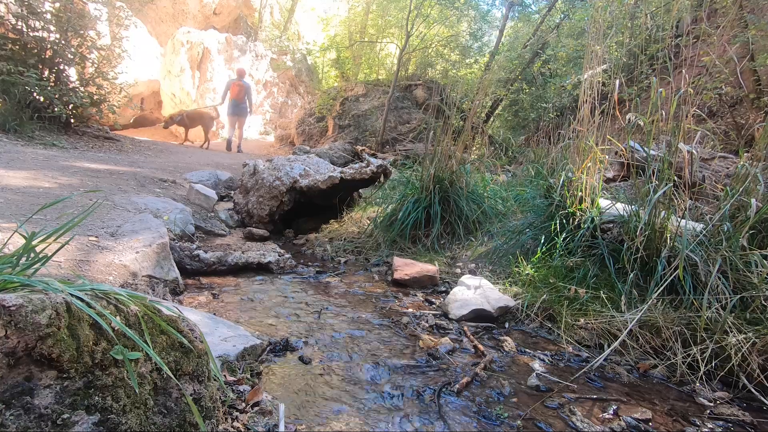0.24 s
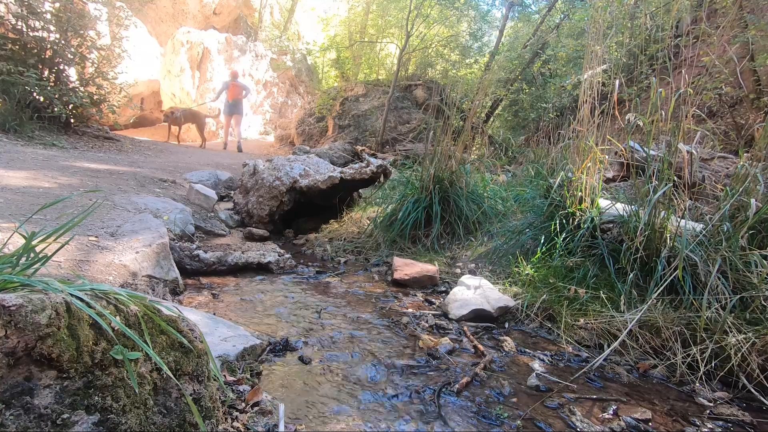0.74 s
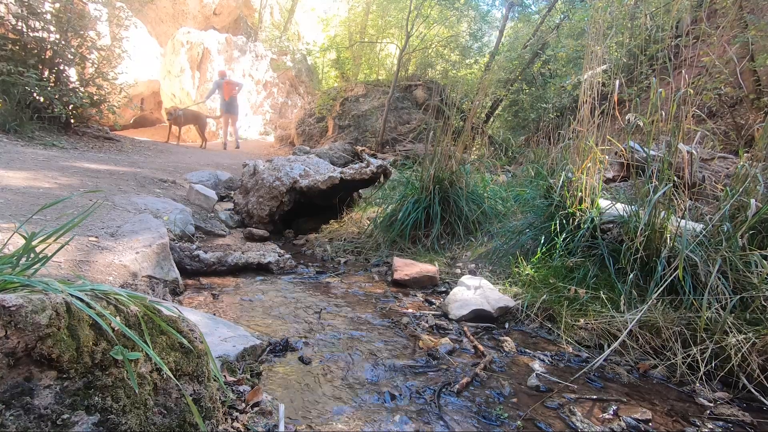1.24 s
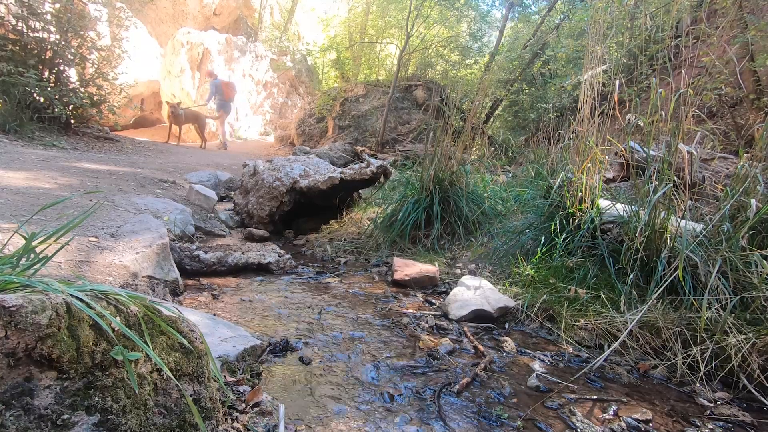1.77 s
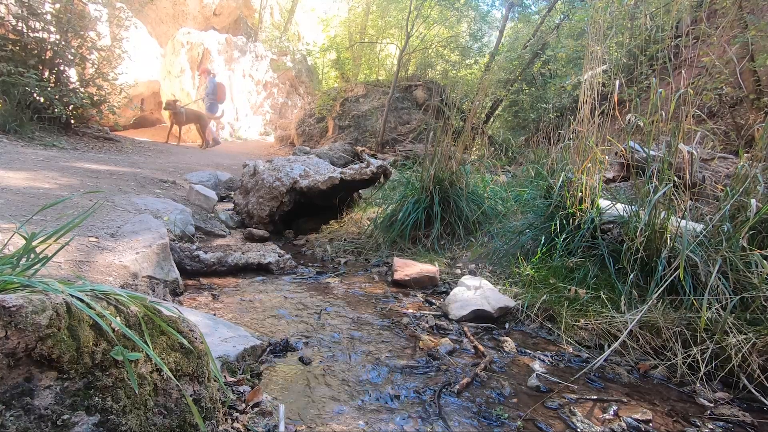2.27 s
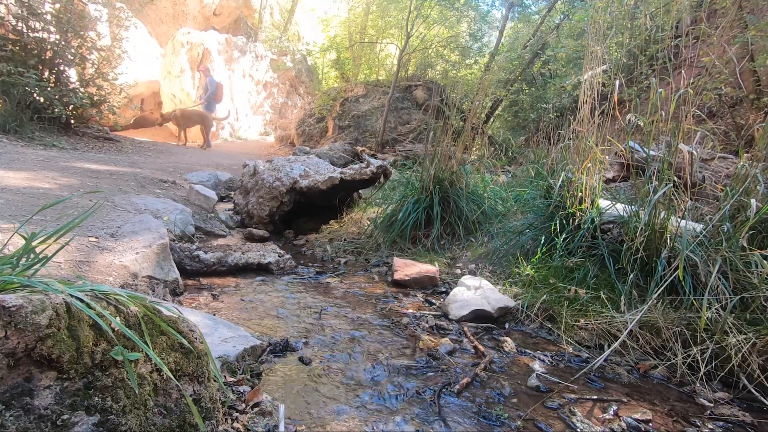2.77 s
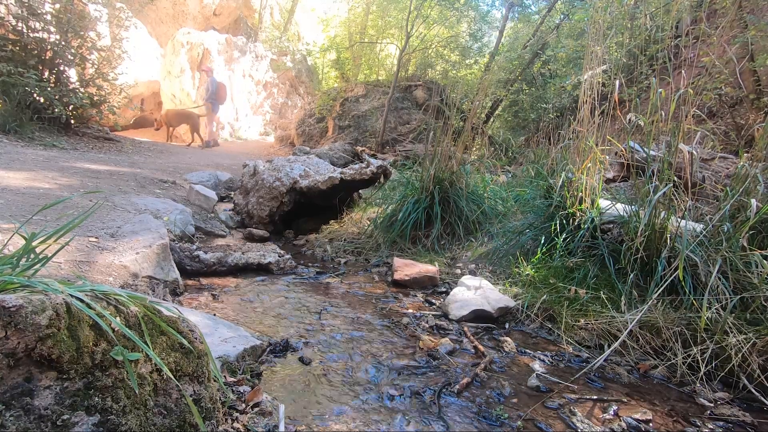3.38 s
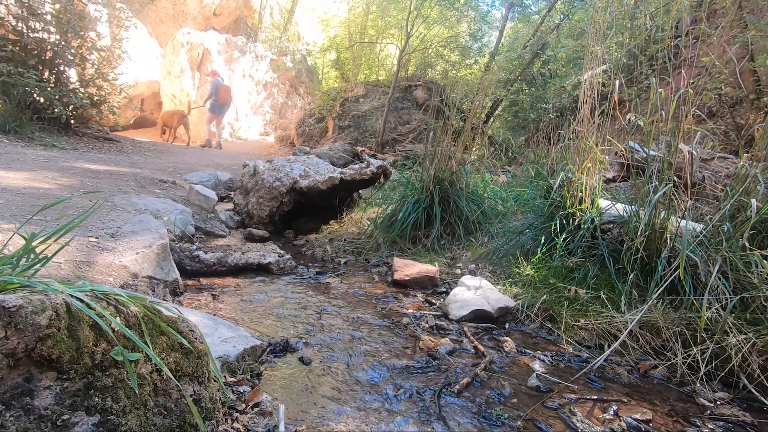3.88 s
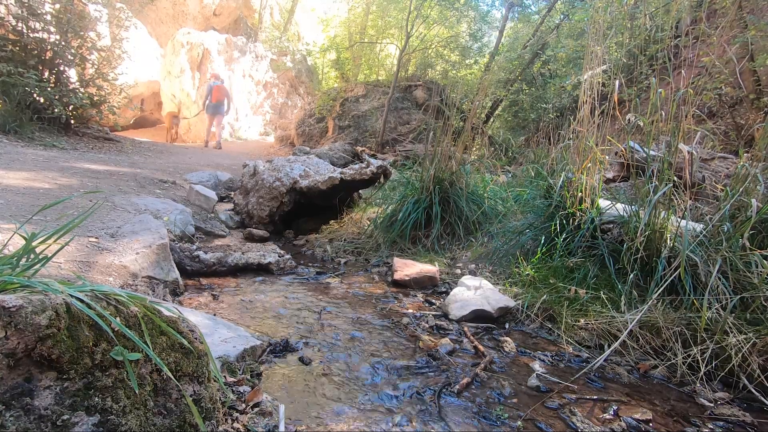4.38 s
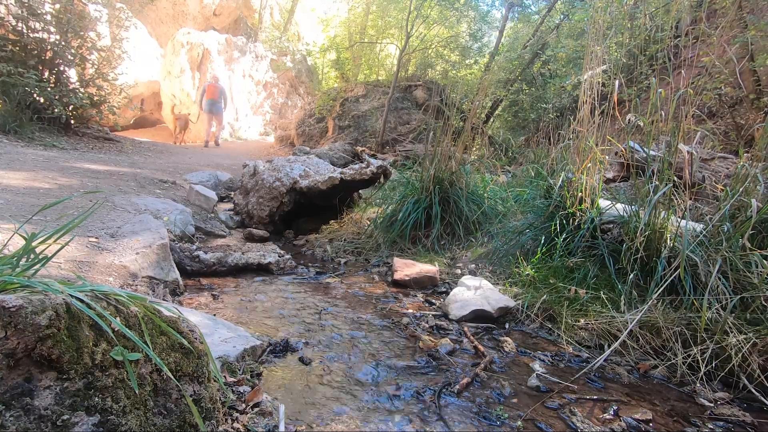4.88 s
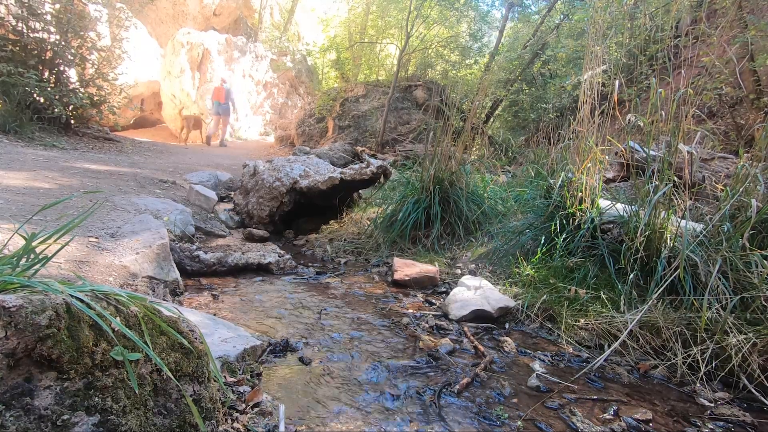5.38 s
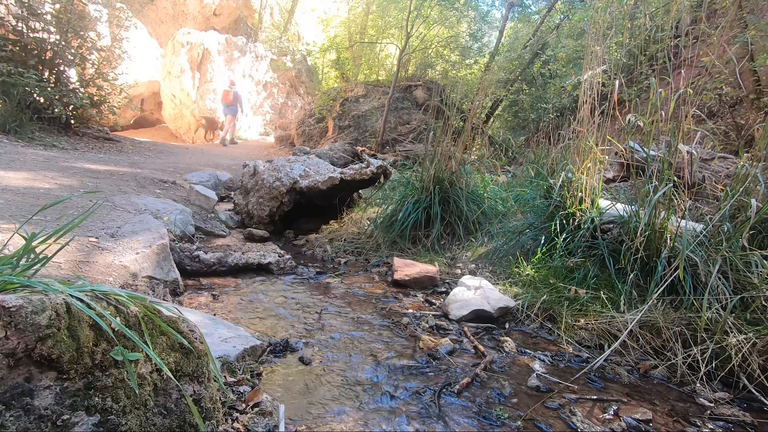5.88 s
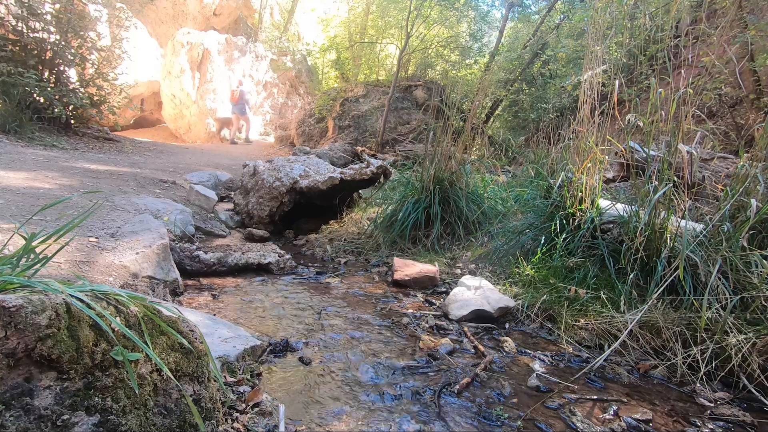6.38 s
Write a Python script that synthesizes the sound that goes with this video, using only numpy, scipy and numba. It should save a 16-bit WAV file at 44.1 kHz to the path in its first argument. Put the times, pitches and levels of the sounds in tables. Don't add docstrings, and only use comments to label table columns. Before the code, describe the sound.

A shallow creek babbles softly outdoors with plinking bubbles, small drop slaps and low glugs, while a handheld microphone gets bumped and rubbed.

```python
import sys
import numpy as np
from scipy import signal
from scipy.fft import rfft, irfft, next_fast_len
from scipy.io import wavfile
from scipy.ndimage import uniform_filter1d
from numba import njit

SR = 44100
rng = np.random.default_rng(int(sys.argv[2]) if len(sys.argv) > 2 else 0)


def boost_factor(decibels):
    exponent = np.asarray(decibels, float) / 20
    return 10 ** exponent


def materialize(psi):
    bounded = np.clip(np.atleast_2d(psi).T, -1, 1)
    quanta = np.round(bounded * 32767).astype(np.int16)
    wavfile.write(sys.argv[1], SR, quanta)


N = 292824
CUT_S, TOP_HZ = 0.13218, 15750

# frequency in Hz, level in dB.
LEFT_COLOUR_HZ_DB = [(20, -58), (45, -84), (110, -81), (250, -87), (450, -87), (900, -88), (2000, -89),
                     (2900, -94.5), (4500, -92.5), (7000, -102.4), (10000, -105.1), (15500, -108.0)]
# frequency in Hz, level in dB.
RIGHT_COLOUR_HZ_DB = [(20, -63), (45, -81), (110, -86), (250, -92.5), (450, -94.5), (900, -95.5),
                      (2000, -97), (2900, -99.3), (4500, -101.8), (7000, -104.9), (10000, -107.0),
                      (15500, -108.8)]
# resonance in Hz, width in Hz, level in dB.
HOLLOWS = [
    (560, 28, 2),
    (650, 91, -8),
    (970, 54, -4),
    (1200, 117, -6),
    (1609, 24, 1.5),
    (1890, 143, -3.5),
    (2500, 560, -6.5),
    (3500, 36, 3.5),
]
# time in seconds, level in dB re usual.
FLOW_DB = [(0.0, -6), (0.13, 0), (0.3, 1), (0.53, 2.5), (0.77, 5), (1.15, 1.5), (1.71, 5), (1.94, 2.5),
           (2.18, 4), (2.41, -1), (2.65, 2.5), (3.59, 1), (4.76, 2.5), (5.7, 2), (5.94, 4.5), (6.17, 0),
           (6.41, 2), (6.64, 3)]
# time in seconds, slow swing in dB.
SWAY_DB = [(0.14, -38.5), (0.27, -40.5), (0.6, -43), (0.8, -36), (0.95, -45.5), (1.35, -47), (1.55, -44),
           (1.8, -47), (2.2, -44.5), (2.38, -34.5), (2.55, -38.5), (2.8, -35), (3.0, -40), (4.2, -48),
           (4.43, -41), (4.6, -46.5), (5.9, -49.5), (6.64, -47)]
# start in seconds, peak in dB, pitch in Hz, t60 in seconds.
BUMPS = [(0.159, -34, 108, 0.16), (0.31, -53.5, 116, 0.62), (0.74, -34.5, 107.2, 0.19),
         (2.286, -47.5, 96, 0.18), (2.569, -52, 107.6, 0.33), (2.735, -41.5, 108, 0.19),
         (0.56, -58, 188, 0.083), (5.88, -54, 164, 0.16), (6.24, -59.5, 205, 0.19), (5.181, -51, 150, 0.14),
         (1.168, -58, 55, .15), (1.781, -55, 65.4, 0.16), (2.061, -53, 75, 0.19), (4.8, -63, 99.3, 0.44),
         (5.73, -58, 50, 0.17), (6.449, -61, 61, 0.34)]
# start in seconds, length in
# seconds, level in dB, centre in Hz, width in Hz.
RUBS_AND_SPLASHES = [(0.161, 0.12, -61, 1980, 1470), (0.604, 0.054, -55.5, 2200, 1590), (0.616, 0.076, -54.5, 410, 500),
                     (0.71, 0.06, -70, 2500, 4000), (0.796, 0.033, -58.5, 3000, 3500), (0.87, 0.07, -60.5, 3230, 4000),
                     (1.316, 0.13, -61, 1200, 2000), (1.558, 0.12, -67.5, 6750, 8100), (2.448, 0.058, -56, 2170, 1400),
                     (2.45, 0.083, -54.5, 460, 604), (4.003, 0.043, -57, 890, 1500), (5.724, 0.037, -60, 800, 1200),
                     (1.783, 0.081, -63, 3000, 3500), (5.962, .02, -68, 5000, 6000), (6.03, .02, -66, 5000, 6000),
                     (6.531, 0.016, -61, 1500, 3000), (6.598, .016, -65, 1200, 3020), (1.149, 0.016, -64, 2200, 3500),
                     (4.59, 0.035, -64, 1500, 2500), (5.505, .08, -70, 4470, 3000)]
# time in seconds, pitch in Hz, level in dB.
HUM = [
    (.9, 112.4, -91),
    (1.1, 111, -72.5),
    (2.2, 114.3, -66.5),
    (2.9, 117, -86),
    (3.2, 116.7, -67),
    (3.5, 114, -89),
]
# start in seconds, pitch in Hz, peak in dB.
LEFT_DROPS = [(0.1509, 1040, -41), (0.2098, 2070, -24.5), (0.2214, 2140, -34), (0.6115, 2400, -37),
              (0.6293, 2760, -39), (0.6384, 2000, -32), (0.6579, 2500, -35), (0.7087, 3570, -38),
              (0.8, 1860, -34.5), (0.8787, 970, -42), (0.8947, 2130, -34), (1.1533, 3560, -38),
              (1.6511, 1860, -36.5), (2.032, 3406, -36), (2.217, 3960, -49), (2.4476, 2320, -32.5),
              (2.4553, 2140, -42), (2.4619, 2250, -42), (2.6083, 3660, -37.5), (4.0192, 1500, -45),
              (4.2403, 1330, -36), (4.5867, 1890, -36.5), (4.6512, 970, -39.5), (4.9915, 1850, -38.5),
              (4.9907, 2840, -38), (5.2294, 2040, -36), (5.735, 940, -44), (6.3516, 4120, -34.5),
              (6.5289, 3840, -39)]
# start in seconds, pitch in Hz, peak in dB.
GLUGS = [(0.207, 650, -49), (0.519, 624, -50), (0.704, 555, -49), (0.791, 530, -45), (1.082, 617, -49),
         (1.325, 517, -54), (1.345, 560, -45.5), (1.695, 548, -41), (2.003, 580, -47.5), (2.258, 590, -50),
         (2.672, 544, -45), (2.816, 572, -40.5), (2.986, 616, -56), (3.511, 664, -51), (3.549, 590, -49),
         (3.644, 612, -49), (3.758, 523, -55), (4.004, 585, -46), (4.143, 600, -44.5), (4.285, 687, -61),
         (4.487, 530, -51), (4.592, 550, -46), (4.642, 503, -54), (4.872, 600, -54), (5.178, 584, -51.5),
         (5.334, 650, -55), (5.552, 560, -48), (5.944, 620, -52), (6.52, 620, -47), (6.597, 587, -47.5)]
# start in seconds, pitch in Hz, peak in dB, ring in ms.
LEFT_PINGS = [(0.282, 2780, -47, 6.5), (0.624, 355, -45, 14), (0.624, 850, -54, 16),
              (0.647, 2380, -37, 3.2), (0.742, 261, -68, 45), (0.799, 4580, -30, 1.7),
              (0.799, 10240, -47, 2.9), (0.816, 382, -51.5, 21), (0.882, 3850, -46, 3.3),
              (0.887, 333, -46, 11), (0.887, 2220, -46, 10), (1.0976, 1870, -41.5, 3.6),
              (1.452, 845, -48, 12), (1.528, 406, -50.5, 17), (1.5549, 2280, -41, 5),
              (1.7901, 3380, -39, 1.9), (1.852, 10200, -44, 1.6), (2.0948, 4230, -37, 2),
              (2.461, 960, -50, 28), (2.609, 1230, -47, 11), (3.292, 1570, -49.5, 19),
              (3.331, 10820, -45, 2), (4.2, 863, -51, 23), (4.7126, 1770, -42.5, 5.2),
              (5.745, 363, -51, 10), (5.97, 2680, -40.5, 7.4), (6.222, 10500, -49, 1.5),
              (6.4041, 4640, -43, 2), (6.467, 970, -46.5, 12), (6.506, 1490, -45.5, 9.6)]
# start in seconds, pitch in Hz, peak in dB, ring in ms.
RIGHT_BUBBLES = [(0.2115, 1650, -48, 2.2), (0.4505, 930, -52, 4.6), (0.771, 7330, -48, 1.1),
                 (1.233, 6200, -49, 2.7), (1.447, 3600, -50, 4), (1.449, 780, -51, 28),
                 (1.573, 2350, -52, 20), (1.6719, 1430, -48, 4.6), (1.726, 3780, -51, 3.3),
                 (2.108, 815, -50, 11), (2.127, 1520, -49, 5.9), (2.313, 2140, -56, 10),
                 (2.5313, 1300, -43.5, 5), (2.679, 867, -44.5, 4.3), (2.732, 756, -52, 18),
                 (2.793, 3930, -50, 4), (2.843, 714, -49, 11), (3.421, 4840, -48, 2),
                 (4.2054, 2500, -51, 1.8), (4.3611, 1950, -54, 4.1), (4.4214, 4090, -43, 0.66),
                 (4.4853, 3260, -42, 0.76), (4.649, 1330, -56, 10), (5.2941, 2350, -46.5, 2.7),
                 (5.5218, 4630, -43, 0.96), (5.5634, 4340, -45, 1.2), (5.964, 2750, -53, 3.3),
                 (6.0306, 4300, -39, 0.92), (6.03, 8000, -54, 2), (6.057, 706, -55, 20)]
# start in seconds, pitch in Hz, level in dB.
TRICKLE = [(0.1934, 2290, -49), (0.1992, 905, -49.5), (0.3445, 1550, -49), (0.5987, 2500, -47),
           (0.8495, 2090, -47), (0.938, 2750, -51), (1.1213, 1890, -48), (1.3393, 914, -51),
           (1.3707, 1200, -59), (1.4006, 860, -56), (1.5404, 1940, -49), (1.5688, 2270, -48),
           (1.6625, 1760, -49), (1.67, 2510, -50), (1.6835, 1440, -49), (1.8174, 1500, -51),
           (1.818, 2480, -55), (1.8644, 2070, -51), (2.1323, 1620, -47), (2.1628, 2220, -47),
           (2.1785, 2290, -48), (2.2601, 2120, -49), (2.3455, 2520, -49), (2.4635, 660, -52),
           (2.4753, 2290, -53), (2.6933, 1110, -53), (2.7282, 980, -51.5), (2.8867, 2730, -52),
           (3.0273, 1900, -47.5), (3.1881, 1800, -47), (3.2819, 1744, -47), (3.5098, 2740, -48),
           (3.52, 2730, -51), (3.6964, 1900, -49), (3.7906, 2000, -50), (4.0007, 1320, -58),
           (4.3585, 1930, -51), (4.3671, 1220, -56), (4.4426, 1610, -53), (4.4902, 1850, -54),
           (4.7369, 1900, -48), (4.7503, 2700, -49), (4.7505, 1910, -52), (4.7705, 1910, -46),
           (4.8356, 1930, -48), (5.1128, 1810, -50.5), (5.172, 1470, -54), (5.2735, 1920, -49),
           (5.4068, 1870, -47.5), (5.6164, 1850, -47), (5.6645, 2090, -48.5), (5.9381, 1210, -50),
           (6.1698, 985, -51.5), (6.2519, 2510, -49), (6.3381, 2500, -52), (6.523, 1090, -50),
           (6.5242, 2060, -50)]
# start in seconds, pitch in Hz, level in dB.
LEFT_SPRAY = [(0.6104, 4530, -52), (0.6154, 4500, -50), (0.6231, 5070, -56), (0.6442, 2920, -54),
              (0.772, 7080, -61), (0.8606, 12370, -60), (0.8905, 11060, -53), (0.8949, 4080, -48),
              (1.0298, 11060, -54), (1.234, 6330, -55), (1.5641, 3620, -49), (1.6043, 4530, -50),
              (1.6183, 3620, -50), (1.7505, 9890, -55), (1.7821, 3440, -46), (1.8196, 3280, -52),
              (1.8529, 4150, -51), (1.8884, 3600, -53), (2.1703, 11060, -52), (2.2166, 3900, -46),
              (2.2796, 7080, -56), (2.4649, 3620, -54), (2.9529, 11060, -51), (2.9943, 3600, -47),
              (3.3924, 7140, -58), (3.5976, 11060, -56), (3.6663, 4530, -54), (3.7462, 9890, -52),
              (3.778, 11060, -58), (3.7797, 5100, -47.5), (3.8805, 11060, -58), (3.942, 11100, -58),
              (4.7507, 3500, -48), (4.7938, 11060, -60), (5.4394, 8850, -58), (5.5031, 11060, -57),
              (5.5222, 10000, -59), (5.7206, 5600, -55), (5.7402, 5600, -55), (5.7824, 4300, -47),
              (5.9092, 6330, -53), (5.9659, 2880, -52), (6.0346, 4530, -47), (6.105, 5530, -53),
              (6.2171, 8800, -57), (6.2531, 4030, -48), (6.3425, 6330, -59), (6.3635, 4450, -48),
              (6.5244, 3620, -45), (6.6396, 8850, -58)]
# start in seconds, pitch in Hz, level in dB.
GURGLES = [(0.1661, 526, -58), (0.2862, 527, -57), (0.3472, 685, -51.5), (0.6157, 223, -51.5),
           (0.628, 358, -46), (0.7043, 395, -58), (0.7384, 610, -57), (0.7966, 235, -60),
           (1.1163, 338, -60.5), (1.1779, 620, -56), (1.5481, 428, -53), (1.8668, 535, -56.5),
           (2.0195, 363, -59), (2.3377, 630, -58), (2.5333, 238, -61.5), (2.7463, 570, -56),
           (3.3517, 282, -61), (3.4597, 640, -58), (3.8175, 290, -62), (4.2864, 710, -58),
           (4.3742, 329, -62), (5.7343, 576, -52), (5.863, 593, -54), (5.9222, 383, -59), (6.328, 570, -57),
           (6.6261, 290, -60)]
# start in seconds, pitch in Hz, level in dB.
PLINKS = [(0.3998, 1600, -49), (0.4154, 830, -54), (0.5765, 2770, -58), (0.6326, 470, -53),
          (0.7435, 2100, -51), (0.7446, 2970, -52), (1.1004, 845, -54), (1.3692, 1200, -56),
          (1.402, 2970, -58), (1.4241, 3000, -51), (1.4729, 970, -51), (1.8891, 2560, -54),
          (2.0437, 2770, -50), (2.2788, 1470, -52), (2.8402, 2970, -51), (2.9805, 1560, -52),
          (3.1284, 2070, -51), (3.9448, 1200, -53), (4.1794, 1550, -48), (4.4045, 2370, -52),
          (4.4449, 1120, -55), (4.5848, 1270, -55), (4.6061, 1580, -52), (5.239, 1260, -51),
          (5.293, 2410, -53), (5.4429, 1120, -53), (5.4949, 1950, -51), (5.9473, 1920, -46),
          (6.082, 930, -52), (6.5071, 1110, -50)]
# start in seconds, pitch in Hz, level in dB.
RIGHT_SPRAY = [(0.1944, 4920, -52), (0.2509, 3650, -53), (0.2672, 4920, -52), (0.2775, 2710, -57),
               (0.3937, 6000, -51), (1.014, 4460, -56), (1.0471, 4030, -58), (1.1225, 4460, -55),
               (1.2245, 5440, -57), (1.3215, 3310, -55), (1.4402, 3590, -58), (1.5099, 1610, -52),
               (1.5151, 6000, -51), (1.5524, 1350, -56), (1.6035, 6630, -60), (1.671, 2360, -49),
               (1.9641, 1640, -51), (1.9789, 2700, -56), (2.0579, 10900, -61), (2.4491, 1490, -58),
               (2.7945, 9870, -64), (2.8573, 660, -50), (3.3964, 4460, -51), (3.8662, 2000, -54),
               (3.9062, 6000, -54), (3.9166, 4030, -61), (3.9167, 2220, -61), (3.9781, 2200, -54),
               (4.2054, 4500, -57), (4.7573, 7400, -60), (4.9477, 6000, -53), (5.5766, 4030, -58),
               (5.9645, 4460, -50), (5.9651, 7330, -53), (6.0301, 2220, -54), (6.222, 10900, -57),
               (6.3314, 8940, -51), (6.4757, 6630, -51), (6.499, 3650, -55)]

DROP_CYCLES = 3
GLUG_RING_MS, GLUG_USUAL_DB, GLUG_SHORTEN = 14.3, -46, 0.43
STRAY_CYCLES, STRAY_LOW_HZ, STRAY_RANGE = 18, 422, 15
JERK_DB, JERK_RISE_S, JERK_FALL_S = -10.5, 0.025, 0.054
CALM_SHAKE_DB, HARD_SWING_DB, HARD_SHAKE_DB, SHAKE_PER_SWING = -72, -35.5, -59.5, 2.7


def read(table):
    s, *columns = np.transpose(table)
    return [np.interp(np.arange(N) / SR, s, c) for c in columns]


def unit(x):
    return x / np.sqrt(np.mean(x ** 2))


def steady(x, span_s=0.16):
    return unit(x / np.sqrt(uniform_filter1d(x ** 2, int(span_s * SR)) + 1e-30))


def band(x, hz, width_hz):
    return signal.lfilter(*signal.iirpeak(hz, hz / width_hz, fs=SR), x)


def colour(x, table):
    hz, db = np.transpose(table)
    size = next_fast_len(N)
    f = np.maximum(np.arange(size // 2 + 1) * SR / size, 1)
    gain = boost_factor(np.interp(np.log(f), np.log(hz), db)) * (f < TOP_HZ)
    return irfft(rfft(x, size) * gain, size)[:N]


def walk(rate_hz):
    k = int(SR / rate_hz)
    held = np.repeat(rng.standard_normal(N // k + 1), k)
    return 0.88 * uniform_filter1d(uniform_filter1d(held, k), k)[:N]


@njit
def rings(start, hz, gain, fade, rise, glide):
    y = np.zeros(N)
    for k in range(len(hz)):
        z = gain[k] + 0j
        p = np.exp(2j * np.pi * hz[k] / SR - 1 / fade[k])
        turn = np.exp(2j * np.pi * hz[k] * glide[k] / fade[k] / SR)
        shut, opening = 1., np.exp(-1 / (rise * fade[k]))
        for i in range(int(start[k]), min(int(start[k] + 5 * fade[k]), N)):
            y[i] += z.imag * (1 - shut)
            z, p, shut = z * p, p * turn, shut * opening
    return y


def babble(table, cycles=7.7, scatter_db=0.5, hiss_db=-4, gust_db=1.7, flow_share=0.46, count=6000):
    flow_db, = read(FLOW_DB)
    chance = rng.random((count, 5)).T
    hz = 220 * 60 ** chance[1]
    start = chance[0] * (N - 1)
    eddies = np.array([walk(16) for _ in range(4)])[(4 * chance[1]).astype(int), start.astype(int)]
    gusts = gust_db * (eddies + 0.5 * walk(30)[start.astype(int)])
    size_db = np.minimum(gusts - scatter_db * np.log(1 - chance[2]), 8)
    fade = cycles * (0.48 + 1.41 * chance[3]) * SR / hz
    gain = boost_factor(size_db) * hz / (1 + (hz / 7000) ** 2)
    grains = rings(start, hz, gain, fade, 0.19, 0.0673 * chance[4])
    crowd = boost_factor(-9.5) * unit(grains) + boost_factor(hiss_db) * rng.standard_normal(N)
    fine = signal.sosfilt(signal.butter(2, 5800, "high", fs=SR, output="sos"), crowd)
    fine_db = 3.0 + 0.078 * flow_db + 0.9 * walk(7.4)
    crowd = (crowd - fine) * boost_factor(flow_share * flow_db) + fine * boost_factor(fine_db)
    crowd = signal.sosfilt(signal.butter(4, 42, "high", fs=SR, output="sos"), crowd)
    return colour(crowd, table) * boost_factor(35.5)


def arm_swing(noise):
    arm = signal.butter(5, 13, fs=SR, output="sos")
    return steady(signal.sosfilt(arm, band(noise, 7.0, 5.0) + 0.22 * band(noise, 6.0, 2.9)))


def hand_shake(noise):
    return steady(band(band(noise, 28, 24), 32, 52))


def shake_level_db(swing_db):
    s, db, _, _ = np.transpose(BUMPS)
    since_s = np.arange(N) / SR - s[:, None]
    jerks = boost_factor(db + JERK_DB) @ np.exp(np.minimum(since_s / JERK_RISE_S, -since_s / JERK_FALL_S))
    swung = boost_factor(HARD_SHAKE_DB + SHAKE_PER_SWING * (swing_db - HARD_SWING_DB))
    return 20 * np.log10(boost_factor(CALM_SHAKE_DB) + swung + jerks)


def housing_bumps():
    s, db, hz, t60_s = np.transpose(BUMPS)
    fade = t60_s * SR / np.log(1000)
    low = rings(s * SR, hz, boost_factor(db), fade, 0.48, 0 * s)
    return low + rings(s * SR, 1.75 * hz, boost_factor(db - 9.5), 0.74 * fade, 0.2, 0 * s)


def motor_hum():
    hz, db = read(HUM)
    return boost_factor(db + 1.7 * walk(13.0)) * np.sin(2 * np.pi * np.cumsum(hz) / SR)


def motor_drone():
    noise = rng.standard_normal(N)
    return boost_factor(-68.5) * np.exp(-np.arange(N) / SR / 1.26) * unit(band(band(noise, 79, 70), 115, 83))


def rubs_and_splashes():
    rubs, t = 0, np.arange(N) / SR
    for s, length_s, db, hz, width_hz in RUBS_AND_SPLASHES:
        slips = rng.random(N) < 700 / SR
        catches = rng.standard_normal(N) * (slips + boost_factor(-9))
        shape = np.clip((t - s) / 0.0014, 0, 1) * np.clip((s + length_s - t) / (0.5 * length_s), 0, 1)
        rubs = rubs + boost_factor(db) * shape * unit(band(band(catches, hz, width_hz), hz, 1.7 * width_hz))
    return rubs


def hand():
    swing_db, = read(SWAY_DB)
    shake_db = shake_level_db(swing_db)
    swing = [arm_swing(n) for n in rng.standard_normal((2, N))]
    shake = [hand_shake(n) for n in rng.standard_normal((2, N))]
    body = housing_bumps() + motor_hum()
    rubs = rubs_and_splashes()
    left = boost_factor(swing_db + 6.0) * swing[0] + boost_factor(shake_db - 8.5) * shake[0] + body + rubs
    right = boost_factor(swing_db - 2.5) * (0.6 * swing[1] - 0.64 * swing[0]) + boost_factor(0.5 * shake_db - 38.5) * shake[1]
    right = right + boost_factor(-13.0) * np.roll(body, -130) + motor_drone() + boost_factor(-16.0) * rubs
    return np.array([left, right])


def jolt(hz=9.8, rise_hz=17, start_rad=0.76, swing_db=-17.0, fast_s=0.036, rest=0.4):
    t = np.arange(N) / SR
    swing = boost_factor(swing_db) * (rest + (1 - rest) * np.exp(-(t / fast_s) ** 2))
    wave = swing * np.sin(2 * np.pi * (hz * t + rise_hz * t ** 2) + start_rad)
    rustle = boost_factor(-43.5) * np.exp(-t / 0.019) * unit(band(rng.standard_normal(N), 1030, 730))
    rustle = rustle + boost_factor(-57.5) * np.exp(-t / 0.04) * unit(band(rng.standard_normal(N), 3200, 2300))
    return (rustle - wave) * np.array([[1], [-boost_factor(-11.5)]])


def faint(table, cycles, lift_db, rise=0.26, glide=0.019):
    s, hz, db = np.transpose(table)
    return rings(s * SR, hz, boost_factor(db + lift_db), cycles * SR / hz, rise, glide + 0 * s)


def strays(db, spread_db, count):
    s, size, strength, ring = rng.random((count, 4)).T
    hz = STRAY_LOW_HZ * STRAY_RANGE ** size
    ring_ms = 1000 * STRAY_CYCLES * (0.55 + 1.6 * ring) / hz
    return np.transpose([s * N / SR, hz, db + spread_db * strength, ring_ms])


def clear_bubbles(table, glide=0.043, tick_db=-6, tick_cycles=0.54):
    s, hz, db, ring_ms = np.transpose(table)
    chance = rng.random((len(s), 2)).T
    fade = 0.61 * ring_ms * SR / 1000 / (1 + (hz / 6000) ** 2)
    pings = rings(s * SR, hz, boost_factor(db), fade, 0.19, glide * (0.18 + chance[0]))
    tick_hz = np.minimum(hz * (1.16 + 0.44 * chance[1]), 0.3 * SR)
    return pings + rings(s * SR, tick_hz, boost_factor(db + tick_db), tick_cycles * SR / tick_hz, 0.6, 0 * s)


def drops():
    _, hz, _ = np.transpose(LEFT_DROPS)
    return clear_bubbles(np.column_stack([LEFT_DROPS, 1000 * DROP_CYCLES / hz]), tick_db=-12)


def glugs():
    _, _, db = np.transpose(GLUGS)
    ring_ms = GLUG_RING_MS * boost_factor(GLUG_SHORTEN * (GLUG_USUAL_DB - db))
    return clear_bubbles(np.column_stack([GLUGS, ring_ms]))


def stones(x, wet_db=-9, fade_s=0.019):
    t = np.arange(SR // 10) / SR
    tail = rng.standard_normal(len(t)) * np.exp(-t / fade_s)
    return boost_factor(wet_db) * signal.fftconvolve(x, tail / np.sqrt(np.sum(tail ** 2)))[:N]


def creek():
    left = babble(LEFT_COLOUR_HZ_DB)
    left = left + sum(boost_factor(db) * band(left, hz, width_hz) for hz, width_hz, db in HOLLOWS)
    near = drops() + glugs() + clear_bubbles(LEFT_PINGS)
    left = left + near + stones(near)
    left = left + faint(TRICKLE, 3.65, 5.2) + faint(LEFT_SPRAY, 2.4, 7.4)
    left = left + faint(GURGLES, 3.14, 7.4) + faint(PLINKS, 5.1, 3.2)
    right = babble(RIGHT_COLOUR_HZ_DB, scatter_db=-1.0, hiss_db=-3.0, gust_db=1.0, flow_share=0.31)
    right = right + clear_bubbles(RIGHT_BUBBLES) + clear_bubbles(strays(-63, 4.1, count=60))
    right = right + faint(RIGHT_SPRAY, 2.5, 3.7)
    to_left = boost_factor(-2) * band(right, 2500, 2200)
    to_right = boost_factor(-31) * np.roll(band(left, 720, 1200), -3)
    return np.array([left + to_left, right - to_right])


def scene():
    t = np.arange(N) / SR
    cave = np.arange(N) < CUT_S * SR
    settle = np.clip((t - CUT_S) / 0.012, 0, 1)
    return creek() + np.where(cave, jolt(), settle * hand())


def band_limit(x):
    return signal.sosfilt(signal.butter(12, 15740, fs=SR, output="sos"), x)


def record(dry):
    return band_limit(dry)


dry = scene()
out = record(dry)
materialize(out)
```